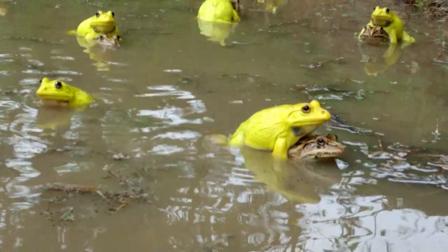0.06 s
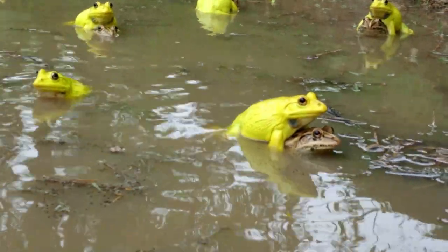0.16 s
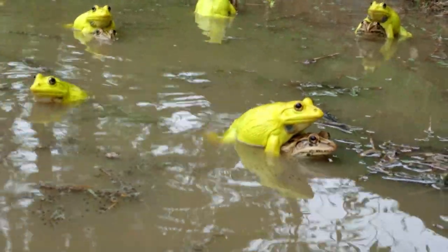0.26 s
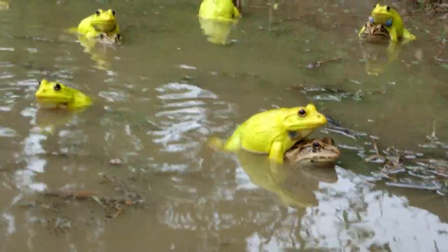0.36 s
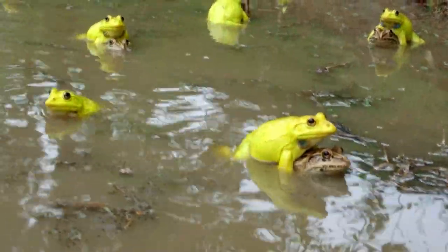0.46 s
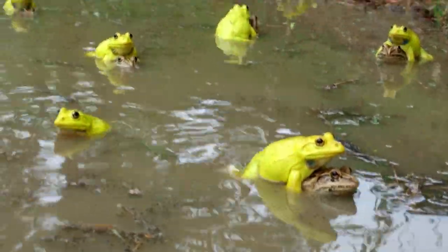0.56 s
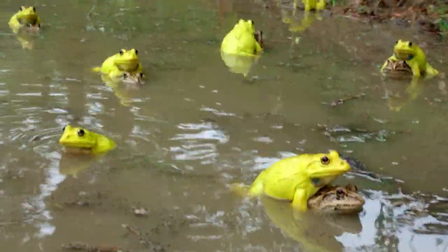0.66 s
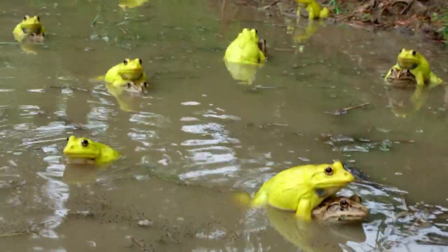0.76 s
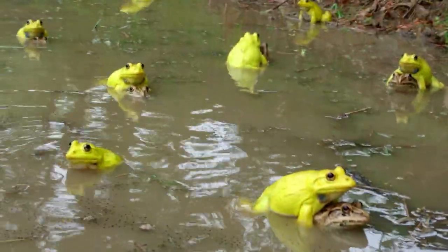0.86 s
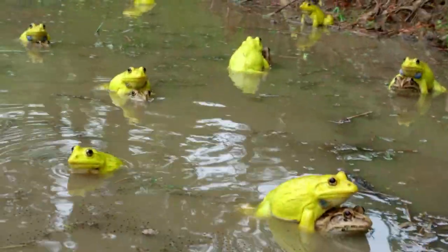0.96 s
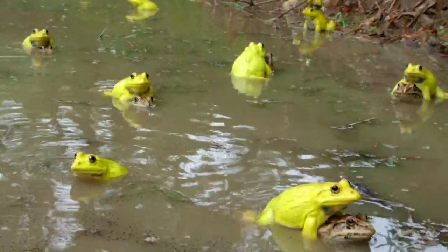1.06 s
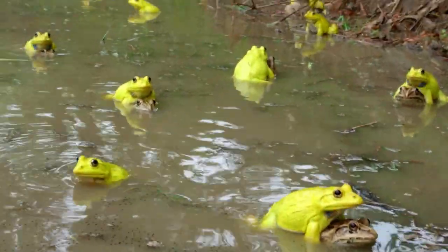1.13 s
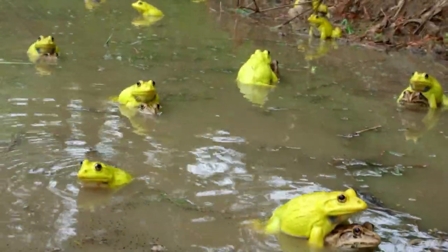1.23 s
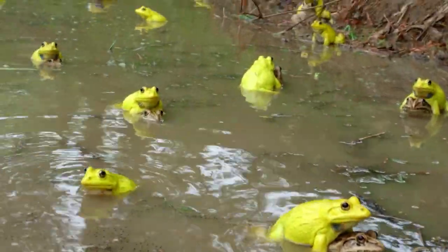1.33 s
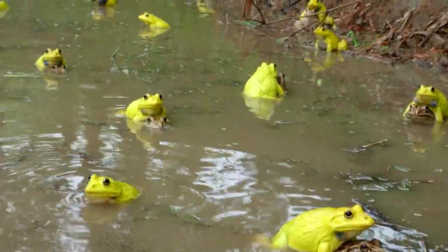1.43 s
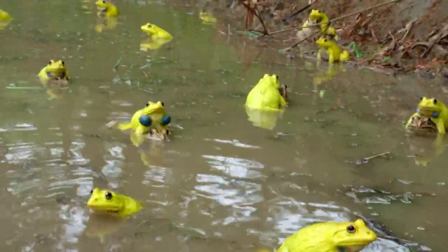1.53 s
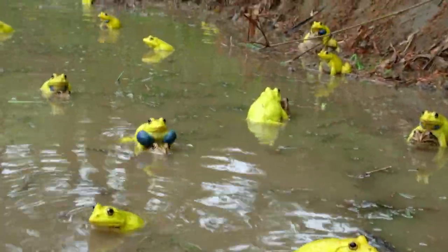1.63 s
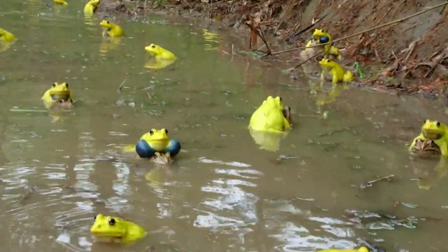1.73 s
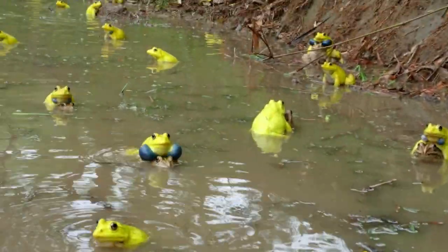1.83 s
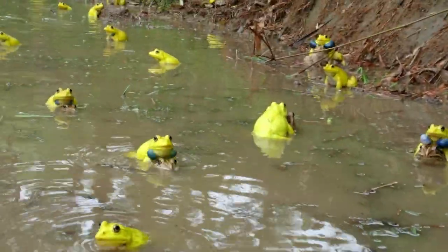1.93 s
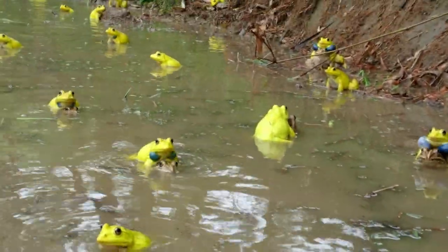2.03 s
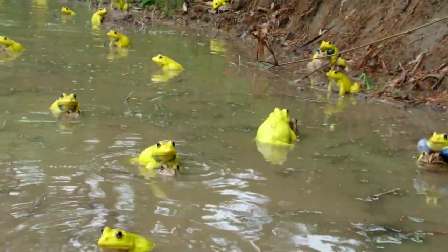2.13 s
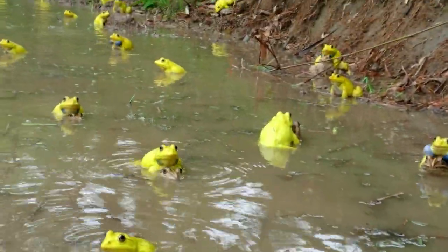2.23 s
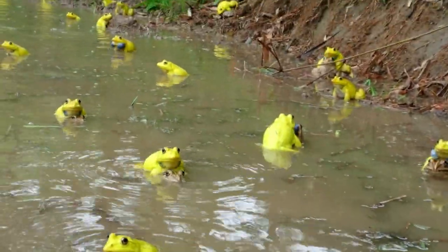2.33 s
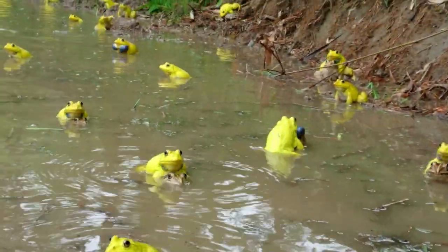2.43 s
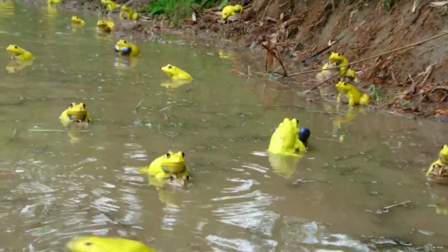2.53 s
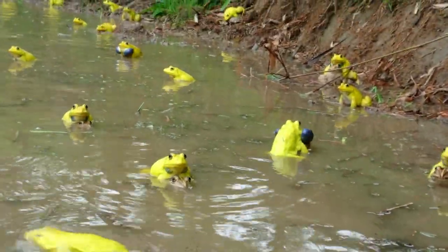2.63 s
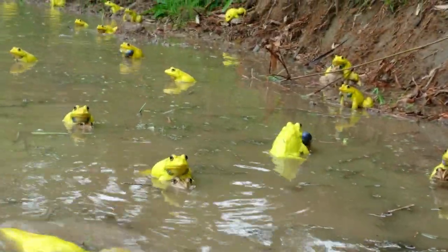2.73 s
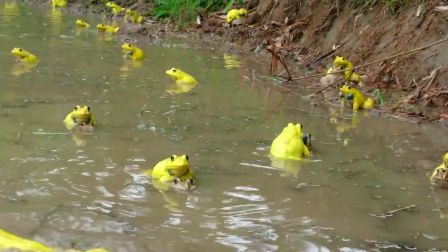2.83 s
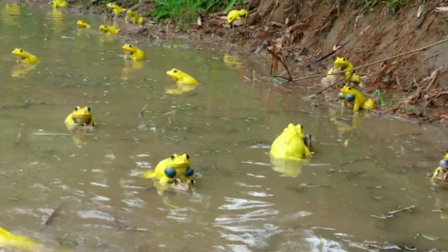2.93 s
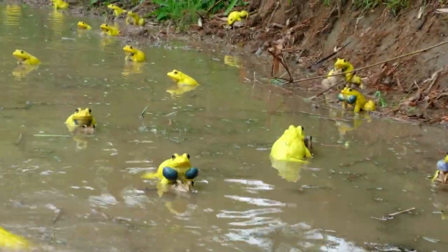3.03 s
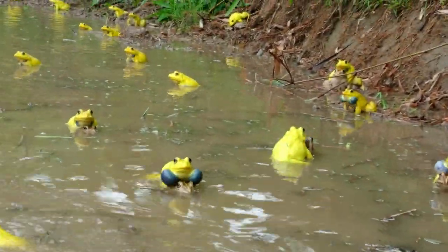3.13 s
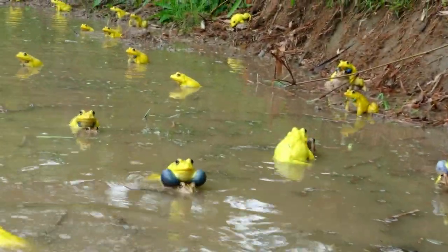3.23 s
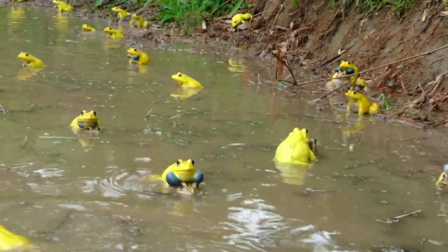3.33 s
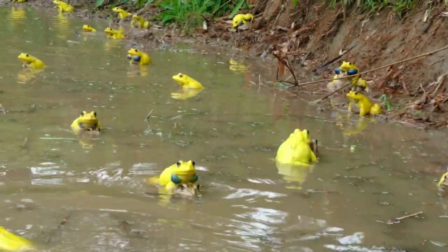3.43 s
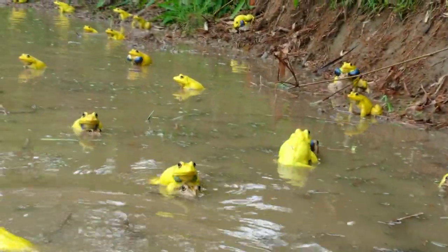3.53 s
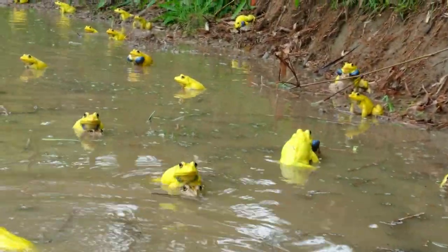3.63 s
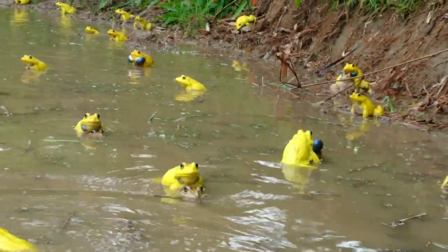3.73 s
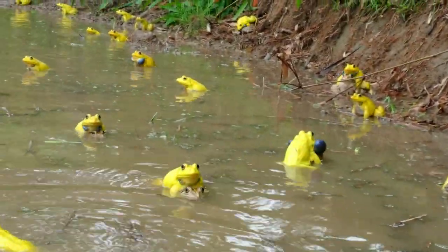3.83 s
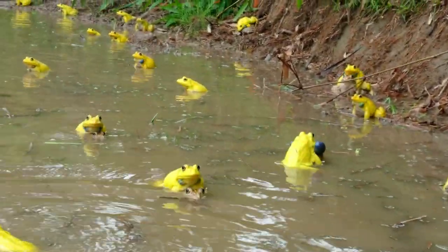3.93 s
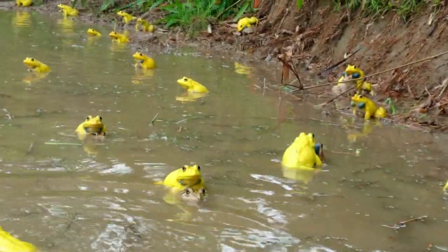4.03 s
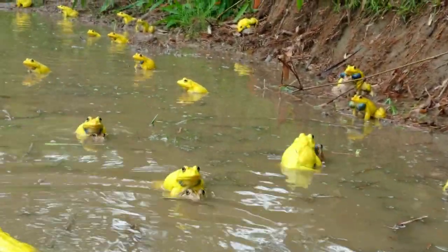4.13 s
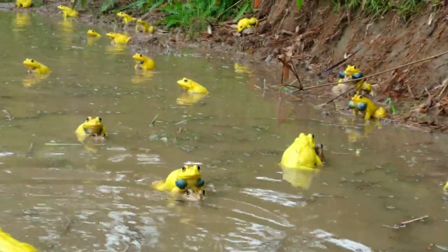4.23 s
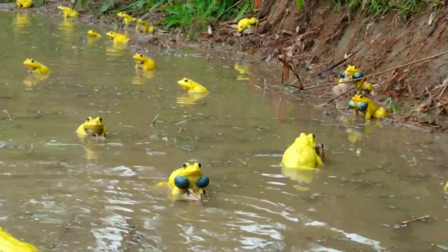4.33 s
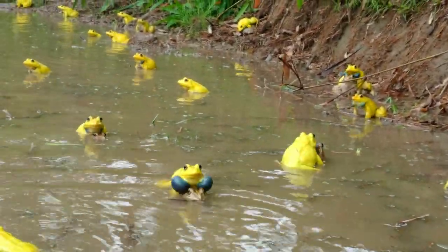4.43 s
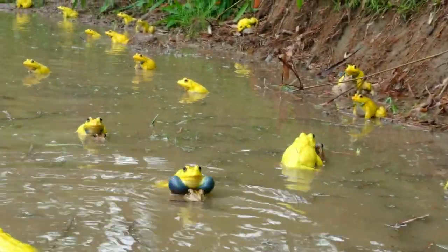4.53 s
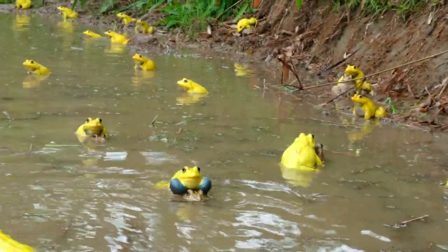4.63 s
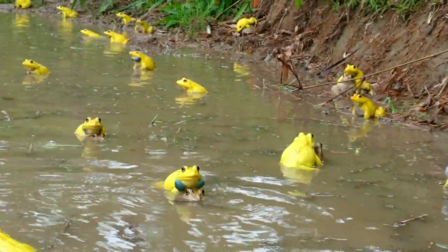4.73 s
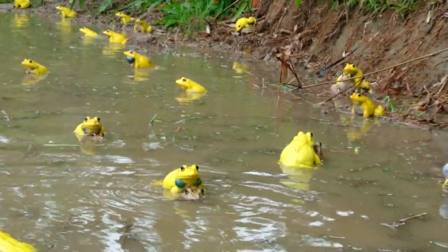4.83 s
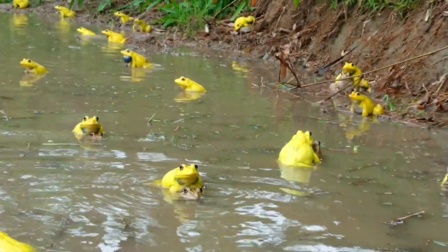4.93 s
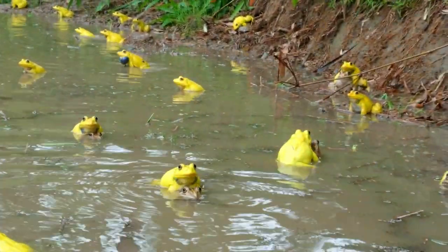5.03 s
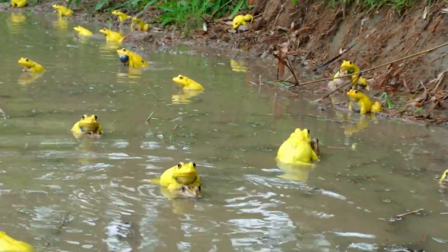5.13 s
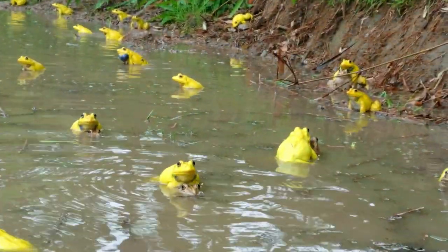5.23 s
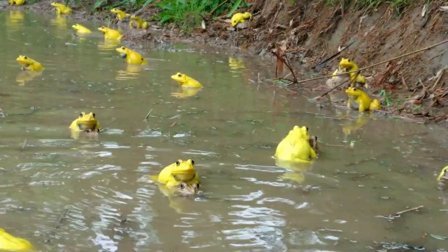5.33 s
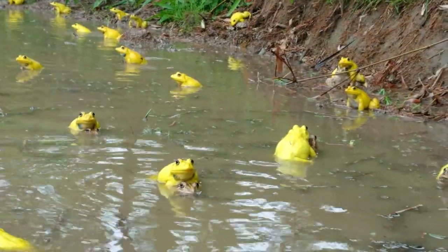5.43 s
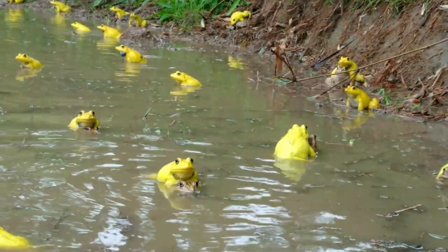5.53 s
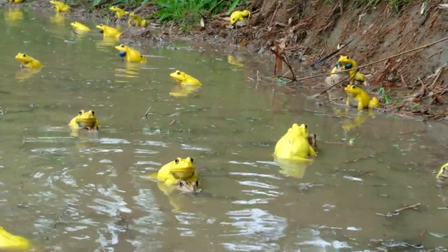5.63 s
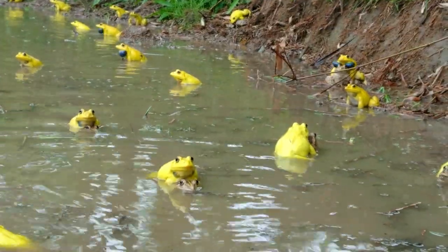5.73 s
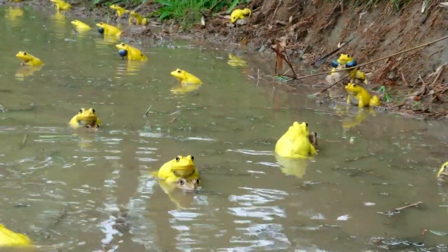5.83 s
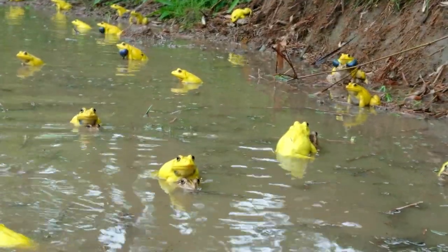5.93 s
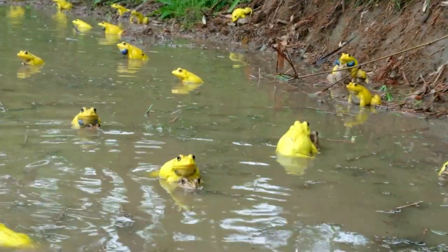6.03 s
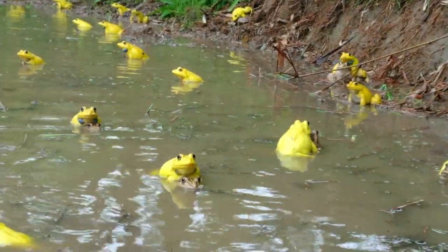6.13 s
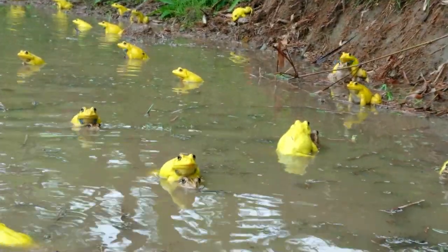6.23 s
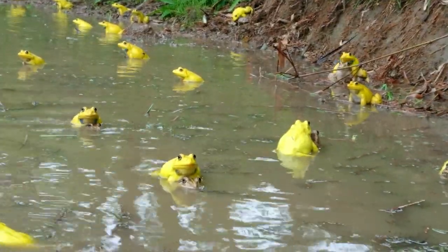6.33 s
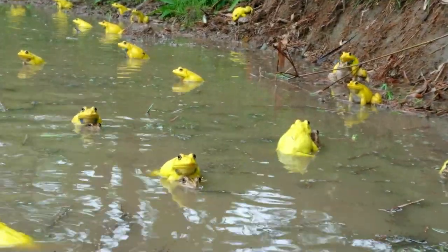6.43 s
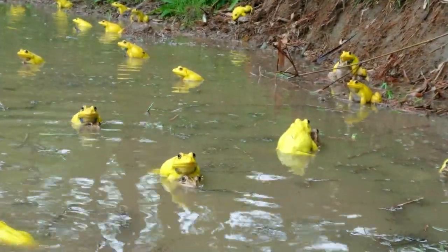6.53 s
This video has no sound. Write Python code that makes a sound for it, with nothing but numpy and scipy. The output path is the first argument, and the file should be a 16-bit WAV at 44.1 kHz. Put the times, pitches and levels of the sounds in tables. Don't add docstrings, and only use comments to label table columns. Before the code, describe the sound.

Many male frogs croak over each other in a muddy pond, hard rattling pulses alternating deep and high, with small water splashes.

```python
import sys
import numpy as np
from scipy import signal
from scipy.fft import rfft, irfft
from scipy.io import wavfile
from scipy.ndimage import uniform_filter1d, minimum_filter1d

SR = 44100
rng = np.random.default_rng(int(sys.argv[2]) if len(sys.argv) > 2 else 0)


def invert_db(x):
    u = np.asarray(x, float) / 20
    return 10 ** u


def log_audio(samples):
    frames = np.atleast_2d(samples).T
    limited = np.clip(frames, -1, 1)
    pcm = np.round(limited * 32767).astype(np.int16)
    wavfile.write(sys.argv[1], SR, pcm)


N = 289737


def rms_one(x):
    return x / np.sqrt(np.mean(x ** 2, axis=-1, keepdims=True) + 1e-20)


def filtered(x, order, hz, kind="low"):
    return signal.sosfilt(signal.butter(order, hz, kind, fs=SR, output="sos"), x)


def struck(t_ms, hz, ring_ms):
    after = np.maximum(t_ms, 0)
    return -np.sin(2 * np.pi * hz * after / 1000) * np.exp(-after / ring_ms)


def add(out, at_s, waves, lead_ms, pan_db):
    for ear, side in enumerate((1, -1)):
        first = np.round((at_s + ear * lead_ms / 1000) * SR).astype(int)
        at = first[:, None] + np.arange(waves.shape[1])
        inside = (at >= 0) & (at < N)
        out[ear] += invert_db(side * pan_db / 2) * np.bincount(at[inside], waves[inside], N)


def drift(step):
    values = rng.standard_normal(N // step + 1)
    return uniform_filter1d(np.repeat(values, step)[:N], size=step)


# pitch_hz, level_db (per Hz)
AIR_COLOUR = [(15, -40), (25, -18.5), (142, -8), (300, -12.5), (766, -33.5), (1480, -13.5), (1830, -8),
              (2440, -13.5), (4590, -17), (7970, -34.5), (9840, -26), (11200, -47.5), (13500, -36)]
# pitch_hz, width_hz, level_db, swell_db
INSECT_BANDS = [
    (9770, 500, -74, 6.5),
    (6900, 30, -93.5, 6),
    (4680, 58, -79.5, 10),
    (139, 8.2, -69, 0.5),
]
AIR_DB = -61.5


def air():
    hz = np.fft.rfftfreq(N, 1 / SR) + 1
    point_hz, point_db = np.array(AIR_COLOUR).T
    shared = 0.38 * rng.standard_normal(N)
    white = rfft(rng.standard_normal((2, N)) + shared)
    colour = invert_db(np.interp(np.log(hz), np.log(point_hz), point_db))
    out = invert_db(AIR_DB + 7.5) * rms_one(irfft(white * colour, N))
    for centre_hz, width_hz, level_db, swell_db in INSECT_BANDS:
        shape = np.exp(-.5 * ((hz - centre_hz) / width_hz) ** 2)
        band = rms_one(irfft(white * shape, N))
        out = out + invert_db(level_db + swell_db * drift(step=9000)) * band
    return out


# start_s, peak_db
SPLASHES = [(0.298, -29), (0.3127, -21.5), (2.316, -26), (2.5197, -20.5), (2.657, -28.5), (2.677, -25.5),
            (3.99, -22), (4.0536, -19.5), (4.1006, -46), (4.158, -20.5), (4.21, -37), (4.268, -20.5),
            (4.365, -15.5), (4.377, -23), (5.009, -27), (5.187, -28), (5.3228, -20), (5.343, -30.5),
            (6.404, -25), (6.415, -43)]


def drips():
    out, (at_s, peak_db) = np.zeros((2, N)), np.transpose(SPLASHES)
    t = np.arange(1500) / SR
    shape = len(at_s), len(t)
    where = (at_s * SR).astype(int)[:, None] + np.arange(len(t))
    for ear in range(2):
        grains = rng.standard_normal(shape) * invert_db(1.6 * rng.standard_normal(shape))
        swelling = rms_one(grains) * t / 0.0071 * np.exp(-t / 0.0083)
        puffs = invert_db(peak_db - 17.5)[:, None] * filtered(swelling, 2, 3500, "high")
        out[ear] += np.bincount(where.ravel(), puffs.ravel(), N)[:N]
    return out


# start_s, length_s, first_hz, last_hz, level_db
WHISTLES = [
    (0.575, .09, 570, 627, -69),
    (0.997, 0.062, 4700, 4700, -59),
    (1.123, 0.032, 4170, 4300, -42),
    (1.313, 0.025, 4200, 4350, -39),
    (5.792, .03, 6000, 6000, -53.5),
]


def bird():
    out = np.zeros((2, N))
    for start_s, length_s, first_hz, last_hz, level_db in WHISTLES:
        count = int(length_s * SR)
        phase = 2 * np.pi * np.cumsum(np.linspace(first_hz, last_hz, count)) / SR
        whistle = np.hanning(count) * np.sin(phase)
        add(out, np.array([start_s]), invert_db(level_db) * whistle[None], .1, -3)
    return out


TICK_FIRST_S, TICK_EVERY_S, TICK_COUNT, TICK_DB = .4572, .03, 8, -37


def ticker():
    out, at_s = np.zeros((2, N)), TICK_FIRST_S + TICK_EVERY_S * np.arange(TICK_COUNT)
    t_ms = np.arange(700) * 1000 / SR
    knock = struck(t_ms, 1850, 2.2) + .25 * struck(t_ms, 3700, 2.5)
    knock = knock * (1 - np.exp(-t_ms / .5))
    level = invert_db(TICK_DB + rng.standard_normal((TICK_COUNT, 1)))
    add(out, at_s, level * knock, .05, -4)
    return out


BREATH_DB, BREATH_LOW_HZ, BREATH_TILT_HZ = -43, 3320, 4430


def breath(voices):
    effort = np.sqrt(uniform_filter1d(np.mean(voices ** 2, axis=0), size=1500) + 1e-12)
    patches_db = 2 * drift(step=2500)
    hiss = filtered(rng.standard_normal((2, N)), 4, BREATH_LOW_HZ, "high")
    hiss = filtered(hiss, 1, BREATH_TILT_HZ)
    return invert_db(BREATH_DB + patches_db) * effort * rms_one(hiss)


BANK_T60_S, BANK_DB, BANK_LOW_HZ, BANK_CUT_HZ = .15, -12, 500, 4500


def bank(x):
    t = np.arange(int(.2 * SR)) / SR
    scattered = rng.standard_normal((2, len(t))) * (rng.random((2, len(t))) < .2)
    echoes = scattered * (t > .003) * invert_db(-60 * t / BANK_T60_S)
    echoes = filtered(echoes, 2, [BANK_LOW_HZ, BANK_CUT_HZ], "band")
    echoes = echoes / np.sqrt(np.sum(echoes ** 2, axis=1, keepdims=True))
    return invert_db(BANK_DB) * signal.fftconvolve(x, echoes, axes=1)[:, :N]


OPENING_PER_S, FASTEST_SHARE = -3, .3


def pulse_times(first_s, last_s, per_s):
    fine = np.arange(first_s, last_s, .001)
    fastest_s = first_s + FASTEST_SHARE * (last_s - first_s)
    rate = np.interp(fine, [first_s, fastest_s, last_s], per_s)
    cycles = np.cumsum(rate) * .001
    at = np.interp(np.arange(cycles[-1]), cycles, fine)
    jitter_s = .00004 * rng.standard_normal(40)[:len(at)]
    return at + jitter_s, np.interp(at, fine, rate)[:, None]


RELEASE_SHARE, RELEASE_DB = 0.061, 2


def croak_swell_db(u, crest, onset_db, fade_db):
    crest = np.clip(crest, .02, .95)
    rise = np.maximum(1 - u / crest, 0)
    fall = np.maximum(u - crest, 0) / (1 - crest)
    release = np.maximum(u - 1 + RELEASE_SHARE, 0) / RELEASE_SHARE
    return -onset_db * rise ** 2 - fade_db * fall ** 1.58 - RELEASE_DB * release


VOICES = {"near": (0.061, -3, 3.3, -11, -11.5, (1.825, -13.5), -3),
          "mid": (0.021, -5, 10, -9, -18, (1.707, -20), -24),
          "high": (0.53, -3.5, 13.1, -5.5, -14, (1, -19), -30),
          "deep": (0.17, -5, 9, -9, -11, (2.074, -12.5), -28.5),
          "left": (0.045, -4.5, 20, -8, -15.5, (1.85, -17.5), -48),
          "right": (0.37, -3.5, 1.7, -6.5, -11.5, (1.57, -17.5), -41),
          "shrill": (-0.039, -5, 1.5, -17, -0.5, (1.55, -24.5), -27)}
# place (in slap periods), level_db
FOLD_SLAPS = [
    (1.5, -24),
    (-1.5, -20),
    (0.5, 0),
]
SLAP_BEFORE_DB = {"near": -7, "mid": -12, "high": -16, "deep": -11, "left": -13, "right": -14, "shrill":
                  -18}
TIGHTEST_AT = {"near": 0.29, "mid": 0.55, "high": .45, "deep": 0.56, "left": 0.57, "right": .5, "shrill":
               .2}
MOUTH_PITCH_HZ = {"near": 2650, "mid": 1080, "high": 1280, "deep": 2750, "left": 1050, "right": 1350,
                  "shrill": 2600}
SAC_RING_MS, MOUTH_RING_MS, RASP_RING_MS, THROAT_SWELL_MS = 1.645, 1, 1.7, 2.27
SAC_ARCH, THROAT_HZ, WAKING_MS = 0.063, 485, 18
SLAP_CYCLES = 4
WEAK_SLAP_DULL = 1.5
RASP_FOLLOWS = 0.7
PUSH_DB, SNAP_DB, WHINE_DB, WHINE_GROWS_DB, PUFF_FADES_DB = -24, -30.5, -46, 14.5, 13
WHINE_HZ, SNAP_TOP_HZ = 5950, 12000


def croak(out, close, first_s, length_s, rate, slowing, frog, peak_db, crest, fade_db, top_hz):
    lead_ms, pan_db, onset_db, throat_db, mouth_db, (rasp_ratio, rasp_db), close_db = VOICES[frog]
    rates = rate + OPENING_PER_S, rate, rate - slowing
    at, per_s = pulse_times(first_s, first_s + length_s, rates)
    u = (at[:, None] - first_s) / length_s
    arch = 1 - SAC_ARCH * (2 * (u - TIGHTEST_AT[frog])) ** 2
    sac_db = peak_db + croak_swell_db(u, crest, onset_db, fade_db)
    sac_hz = top_hz * arch
    chance = rng.standard_normal((40, 12))[:len(at)]
    t_ms = np.arange(1100) * 1000 / SR - 10

    period_ms = 1000 * SLAP_CYCLES / sac_hz * (1 + .01 * chance[:, :1])
    ring_hz = sac_hz * (1 + 0.0013 * chance[:, 5:6])
    rasp_hz = rasp_ratio * sac_hz * (1 + 0.023 * chance[:, 6:7])
    sac = rasp = 0
    for k, (place, slap_db) in enumerate([*FOLD_SLAPS, (-.5, SLAP_BEFORE_DB[frog])]):
        since = t_ms - place * period_ms
        force = invert_db(slap_db + .8 * chance[:, 1 + k:2 + k])
        dull_db = WEAK_SLAP_DULL * slap_db
        mouth = invert_db(mouth_db + dull_db) * struck(since, MOUTH_PITCH_HZ[frog] * arch, MOUTH_RING_MS)
        sac = sac + force * (struck(since, ring_hz, SAC_RING_MS) + mouth)
        rasp = rasp + force * invert_db(dull_db) * struck(since, rasp_hz, RASP_RING_MS)
    swell = np.exp(-.5 * ((t_ms + 1.71) / THROAT_SWELL_MS) ** 2)
    throat = -swell * np.cos(2 * np.pi * (t_ms - .4) * THROAT_HZ * arch ** 0.13 / 1000)
    rasp_level = invert_db(rasp_db + RASP_FOLLOWS * (sac_db - peak_db))
    wave = rms_one(sac) + invert_db(throat_db) * rms_one(throat) + rasp_level * rms_one(rasp)

    per_pulse = np.sqrt(SR / per_s / len(t_ms))
    waking = 1 - .8 * np.exp(-u * length_s * 1000 / WAKING_MS)
    size = per_pulse * waking * invert_db(sac_db + 1.1 * chance[:, 7:8])
    start_s = at - .0108
    add(out, start_s, wave * size, lead_ms, pan_db)

    push = rms_one(np.exp(-.5 * (t_ms / .6) ** 2))
    edge = struck(t_ms, 4800, .12) + .4 * struck(t_ms + period_ms, 4200, .2)
    snap = rms_one(filtered(edge, 1, SNAP_TOP_HZ)) * invert_db(1.5 * chance[:, 8:9])
    whine_hz = WHINE_HZ * np.sqrt(arch) * (1 + .012 * chance[:, 9:10])
    whine = rms_one(struck(t_ms, whine_hz, 3.0))
    puff = invert_db(PUSH_DB + close_db) * push + invert_db(SNAP_DB) * snap
    extra = invert_db(-PUFF_FADES_DB * u ** 2) * puff + invert_db(WHINE_DB + WHINE_GROWS_DB * u) * whine
    add(close, start_s + .0008, extra * size * invert_db(close_db), lead_ms, -13)


# start_s (first pulse), length_s, pulses_per_s, slowing_per_s (by the end)
LEADING_CROAKS = [(0.0122, 0.4, 74.0, 13.5), (0.6913, 0.33, 80.0, 9.0), (1.085, 0.34, 73.75, 8.5),
                  (1.4341, 0.22, 78.25, 9.0), (1.633, 0.26, 79.25, 8.0), (1.8402, 0.21, 77.0, 7.0),
                  (2.023, 0.23, 79.0, 10.0), (2.2062, 0.24, 74.0, 11.0), (2.4347, 0.35, 78.5, 13.5),
                  (2.8005, 0.29, 83.5, 13.5), (3.0703, 0.29, 78.75, 8.0), (3.3748, 0.35, 75.75, 4.5),
                  (3.726, 0.39, 75.5, 12.0), (4.0897, 0.3, 78.5, 8.5), (4.3925, 0.3, 78.5, 9.5),
                  (4.666, 0.25, 79.25, 11.0), (4.8902, 0.25, 72.5, 2.5), (5.142, 0.21, 73.0, 7.0),
                  (5.3527, 0.31, 77.0, 3.5), (5.6762, 0.34, 77.25, 5.0), (6.0085, 0.25, 77.0, 13.5),
                  (6.2283, 0.28, 76.75, 6.0)]
# frog, peak_db, crest (share of the croak), fade_db (after it), sac_hz
LEADING_FROGS = [("deep", -20.5, 0.29, 21, 1690), ("high", -25, 0.67, 19.3, 1905),
                 ("deep", -20.5, 0.38, 12.3, 1750), ("high", -21.5, 0.77, 3, 1910),
                 ("near", -12.5, .2, 8, 1706), ("mid", -18, 0.2, 2, 1783), ("near", -12.5, 0.24, 13, 1763),
                 ("high", -22.5, 0.09, 12.5, 1897), ("high", -18.5, 0.2, 12.6, 1940),
                 ("high", -21, 0.64, 0.67, 1810), ("near", -12.5, 0.053, 10, 1690),
                 ("mid", -20, 0.43, 2.4, 1680), ("deep", -17.5, 0.4, 13, 1565),
                 ("mid", -17.5, 0.46, 4.3, 1760), ("near", -12, 0.2, 11, 1746),
                 ("near", -15, 0.38, 12, 1785), ("mid", -25.5, 0.033, 6.7, 1693),
                 ("mid", -38.5, 0.074, 16, 1680), ("mid", -29, 0.37, 22, 1650),
                 ("mid", -18.5, 0.65, 9.6, 1680), ("high", -24.5, 0.13, 7.3, 1913),
                 ("mid", -33, 0.052, 30, 1545)]
NEIGHBOURS = {"right": [(.124, .29, 77, -32, 1990), (.744, 0.18, 76, -24, 1810),
              (1.037, 0.13, 72, -37.5, 1440), (1.18, .24, 84, -26.5, 2106), (2.551, .23, 76, -24, 1650),
              (2.78, 0.13, 64.5, -24, 1900), (3.972, .25, 80, -19.5, 1790), (4.426, 0.43, 77, -47.5, 1540),
              (5.018, .29, 61.4, -29.5, 1727), (5.506, 0.26, 74, -31.5, 1370), (6.15, .31, 77, -29, 1660),
              (6.44, 0.15, 110, -48, 1520), (5.25, 0.16, 92, -41, 1600)],
              "left": [(1.709, 0.14, 76.5, -25.5, 1273), (2.048, 0.17, 75, -24, 2050),
              (2.315, 0.33, 62, -22, 1663), (3.07, 0.25, 77, -18, 1860), (3.498, 0.39, 76, -20, 1858),
              (3.699, .34, 75.5, -20, 1254), (4.183, 0.23, 75, -25, 1484), (5.698, .2, 73, -27, 1584)],
              "shrill": [(2.792, .39, 71, -34.5, 3580), (3.848, 0.21, 74.5, -21.5, 3700),
              (4.051, 0.28, 55, -33.5, 3350)]}
ANSWER_CREST, ANSWER_FADE_DB, ANSWER_SLOWING_PER_S = 0.24, 8.5, 6
VOICE_LOW_HZ, VOICE_TOP_HZ = 220, 4300


def chorus():
    out, close = np.zeros((2, 2, N))
    for beat, caller in zip(LEADING_CROAKS, LEADING_FROGS):
        croak(out, close, *beat, *caller)
    for frog, rows in NEIGHBOURS.items():
        for start_s, length_s, per_s, peak_db, sac_hz in rows:
            croak(out, close, start_s, length_s, per_s, ANSWER_SLOWING_PER_S,
                  frog, peak_db, ANSWER_CREST, ANSWER_FADE_DB, sac_hz)
    edges = signal.cheby2(5, 30, [VOICE_LOW_HZ, VOICE_TOP_HZ], "band", fs=SR, output="sos")
    return -signal.sosfilt(edges, out) + filtered(close, 2, 60, "high")


def scene():
    voices = chorus() + ticker() + bird()
    return voices + bank(voices) + breath(voices) + drips() + air()


def top_cut(x):
    return signal.sosfilt(signal.butter(12, 15920, fs=SR, output="sos"), x)


def record(dry):
    duck = np.minimum(1, .89 / (np.abs(dry) + 1e-9))
    duck = uniform_filter1d(minimum_filter1d(duck, size=133), size=133)
    return top_cut(dry * duck)


dry = scene()
out = record(dry)
log_audio(out)
```